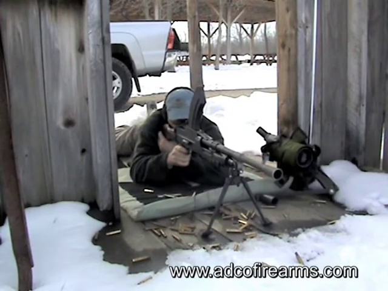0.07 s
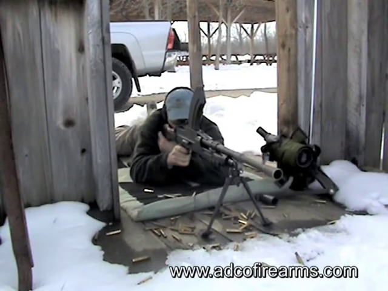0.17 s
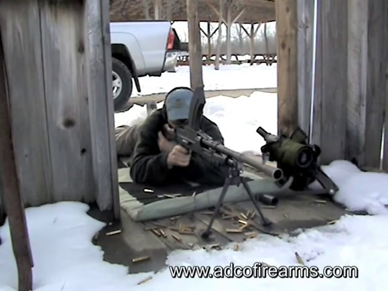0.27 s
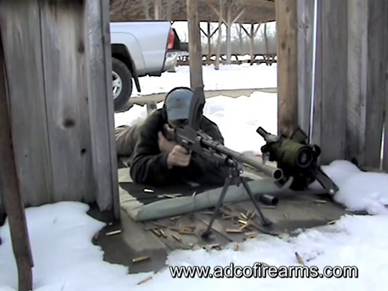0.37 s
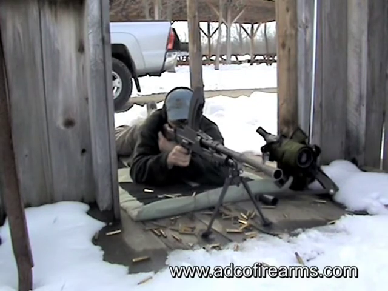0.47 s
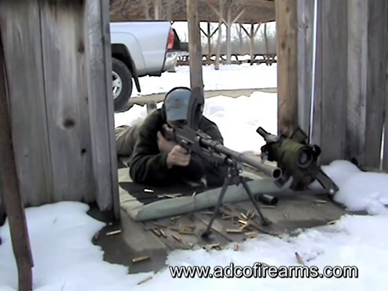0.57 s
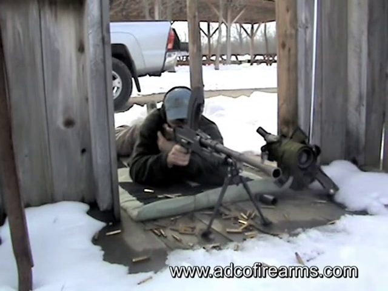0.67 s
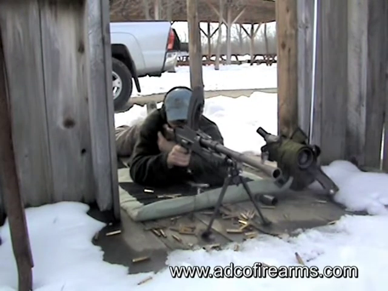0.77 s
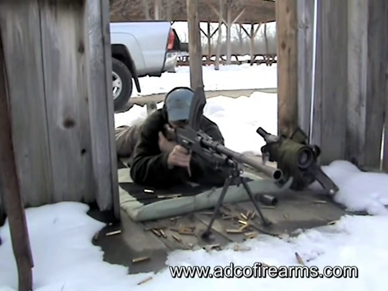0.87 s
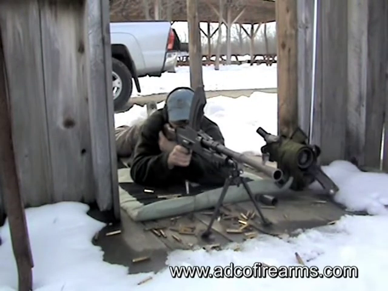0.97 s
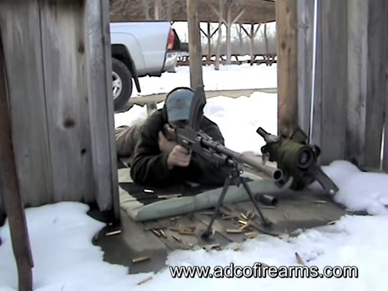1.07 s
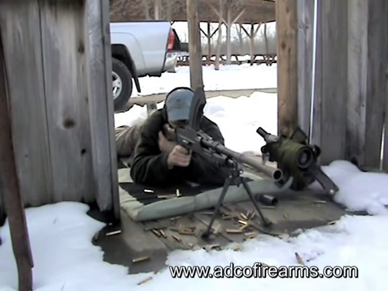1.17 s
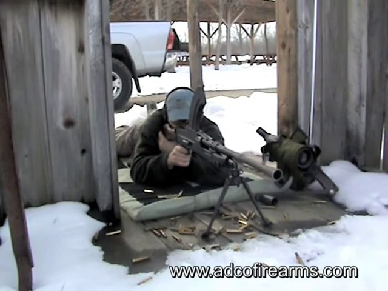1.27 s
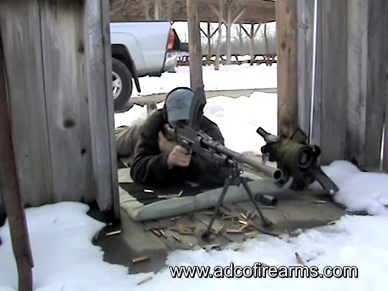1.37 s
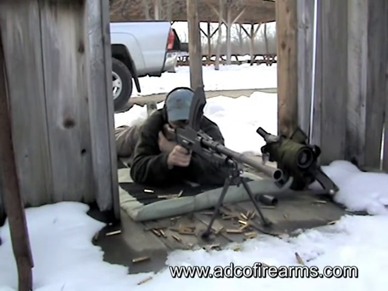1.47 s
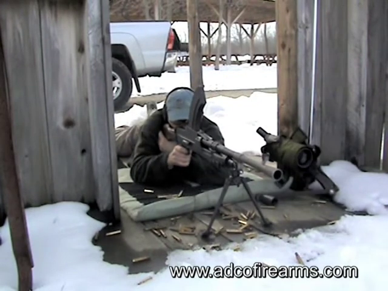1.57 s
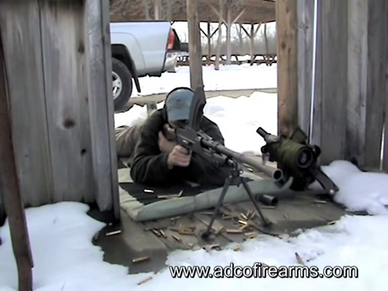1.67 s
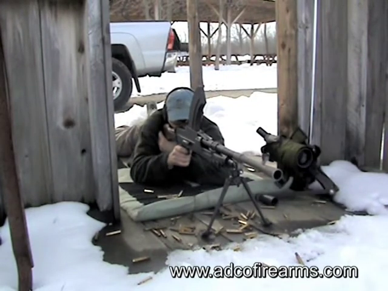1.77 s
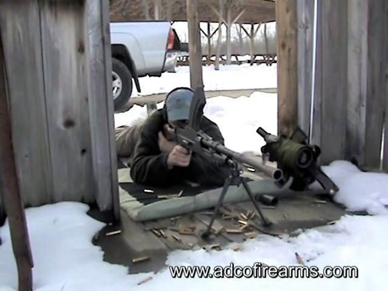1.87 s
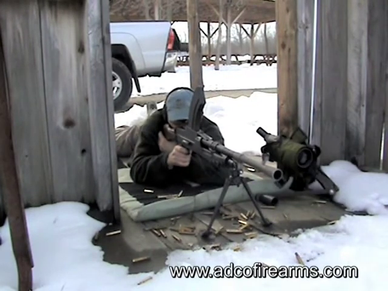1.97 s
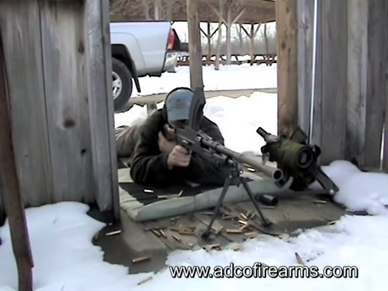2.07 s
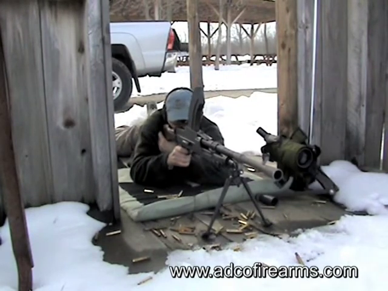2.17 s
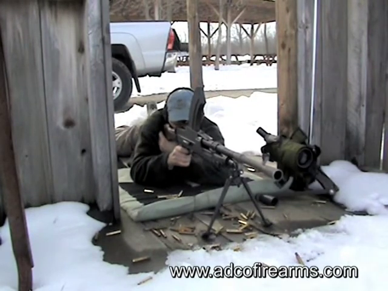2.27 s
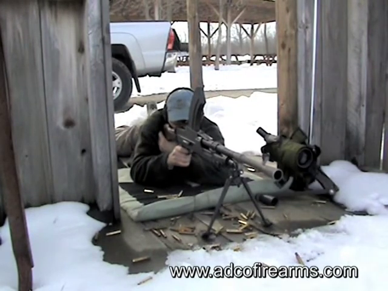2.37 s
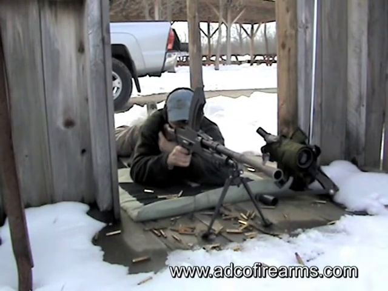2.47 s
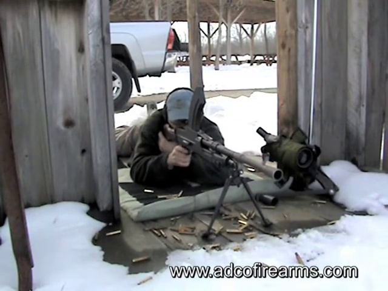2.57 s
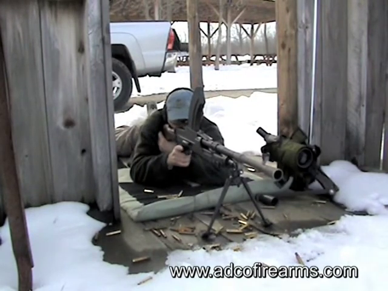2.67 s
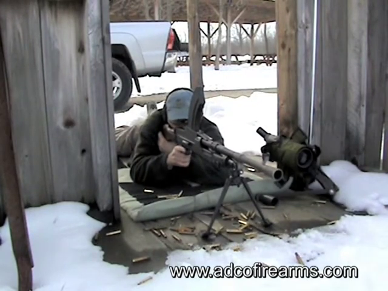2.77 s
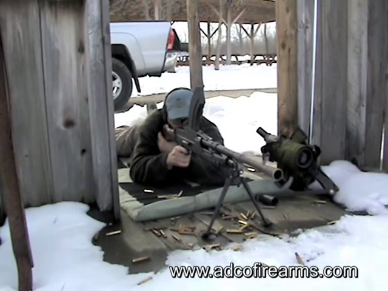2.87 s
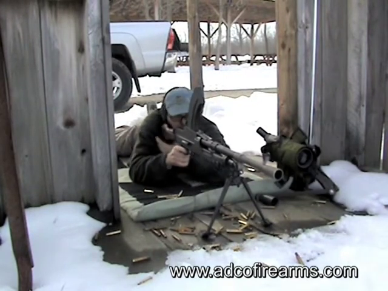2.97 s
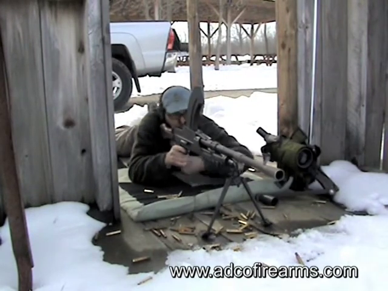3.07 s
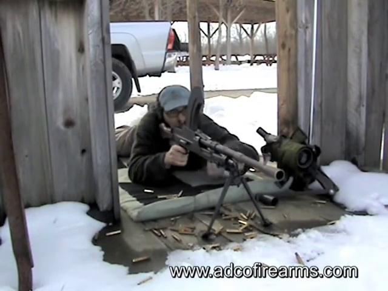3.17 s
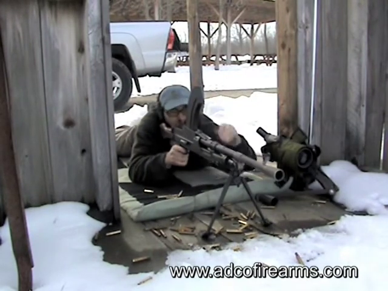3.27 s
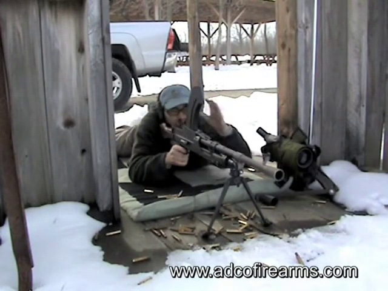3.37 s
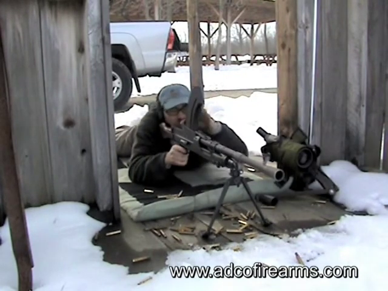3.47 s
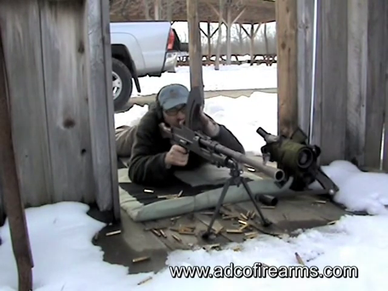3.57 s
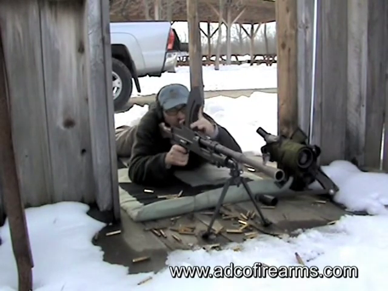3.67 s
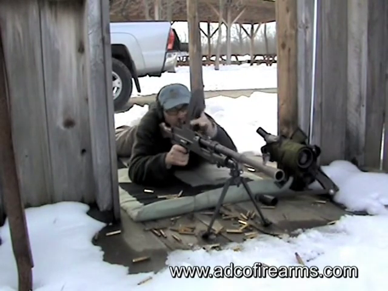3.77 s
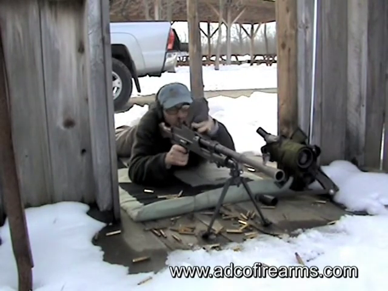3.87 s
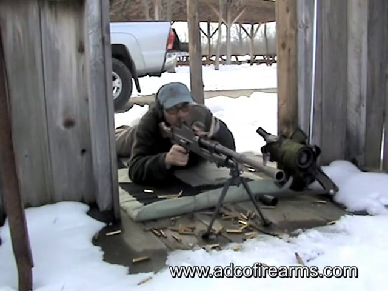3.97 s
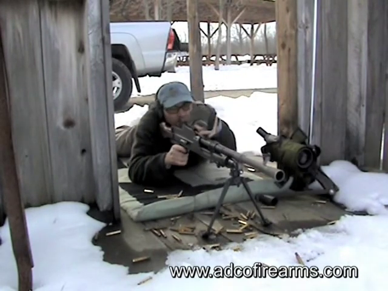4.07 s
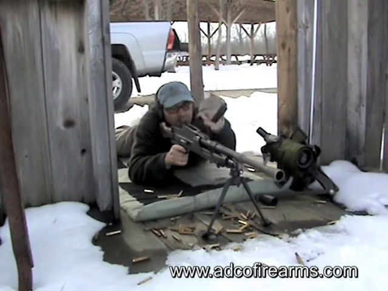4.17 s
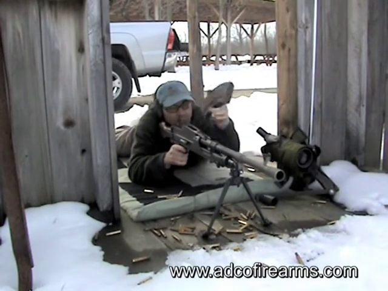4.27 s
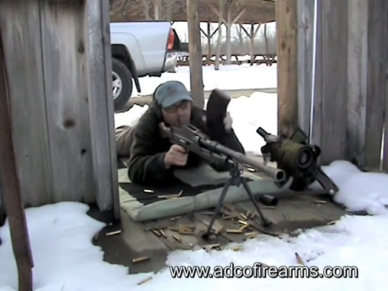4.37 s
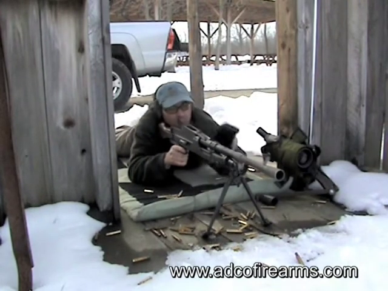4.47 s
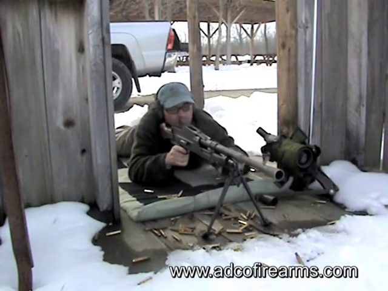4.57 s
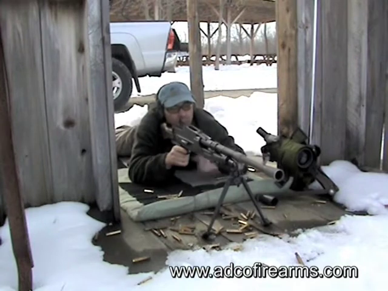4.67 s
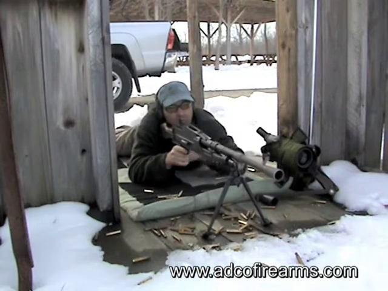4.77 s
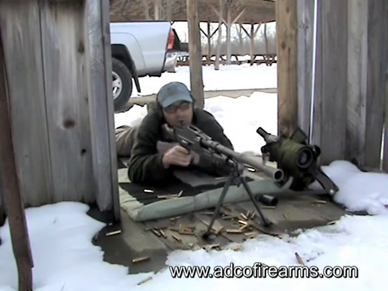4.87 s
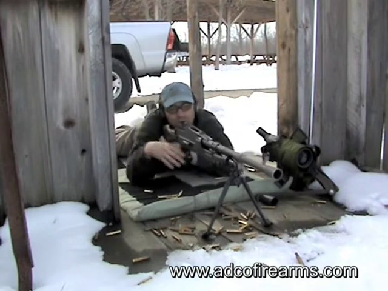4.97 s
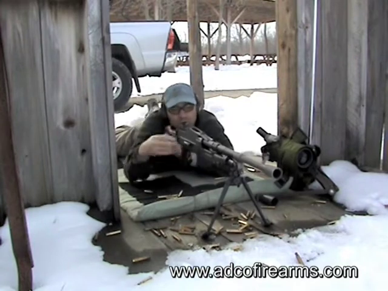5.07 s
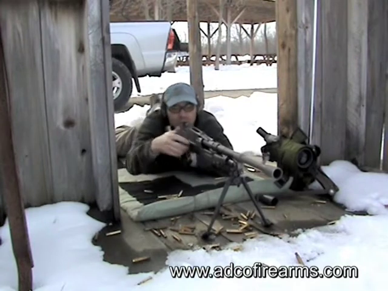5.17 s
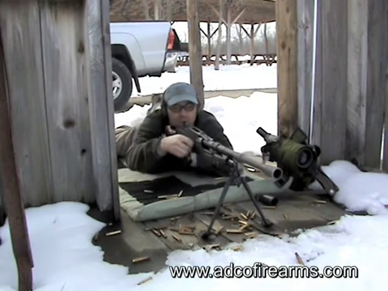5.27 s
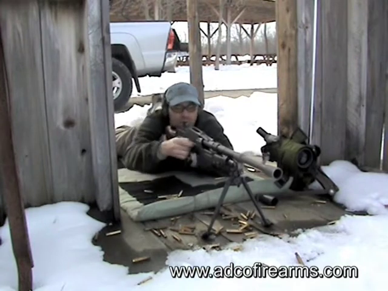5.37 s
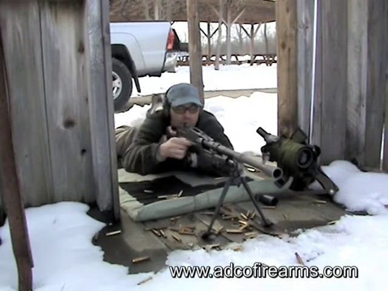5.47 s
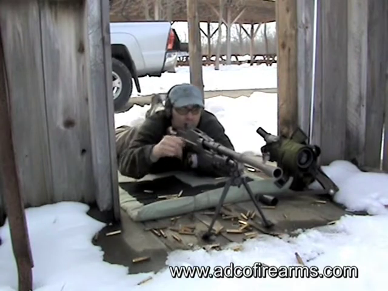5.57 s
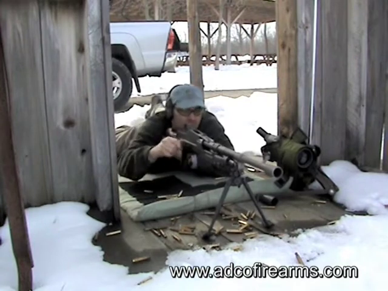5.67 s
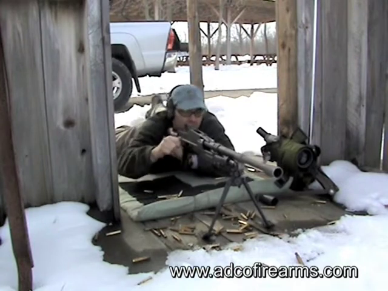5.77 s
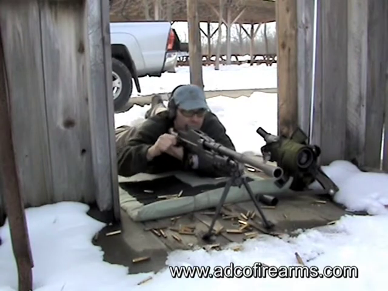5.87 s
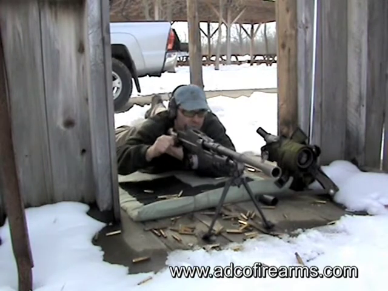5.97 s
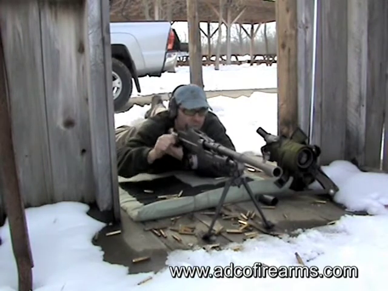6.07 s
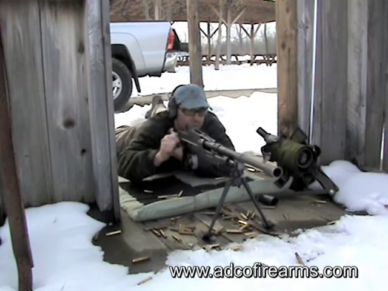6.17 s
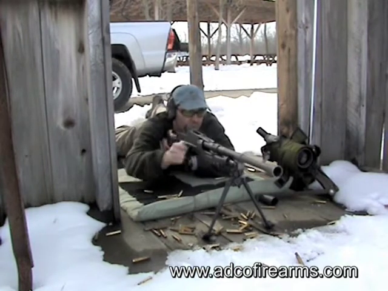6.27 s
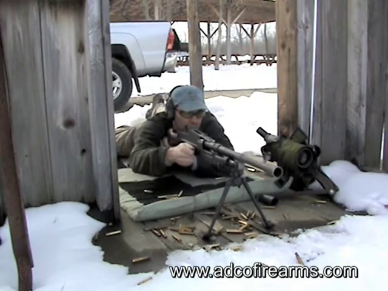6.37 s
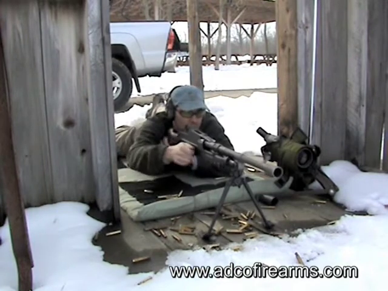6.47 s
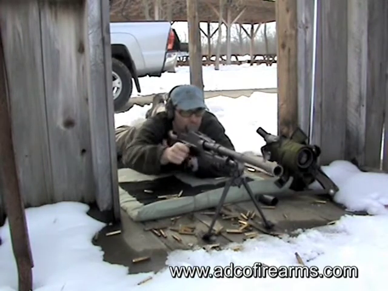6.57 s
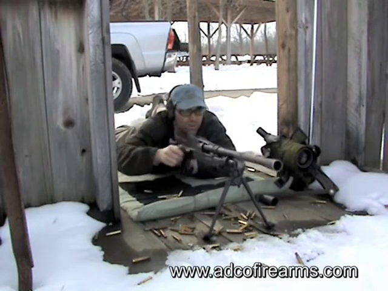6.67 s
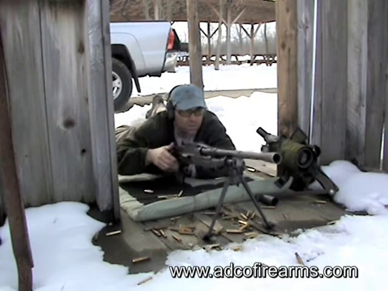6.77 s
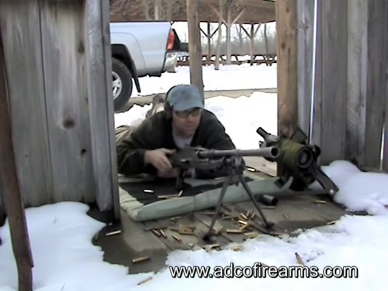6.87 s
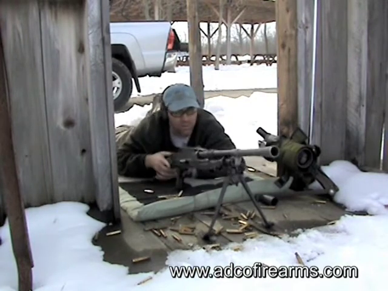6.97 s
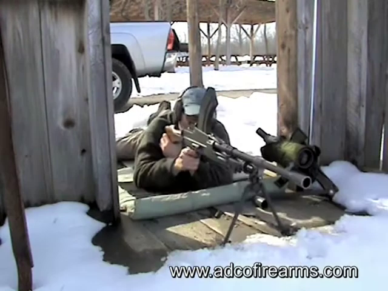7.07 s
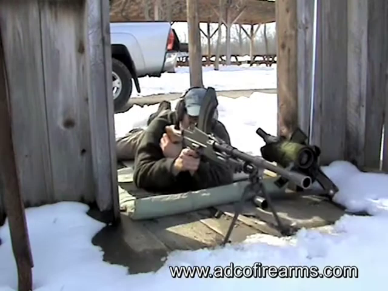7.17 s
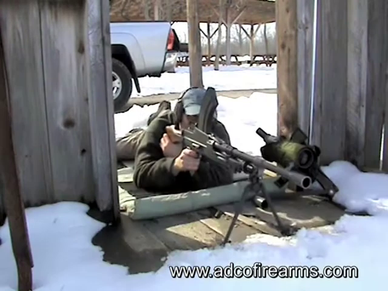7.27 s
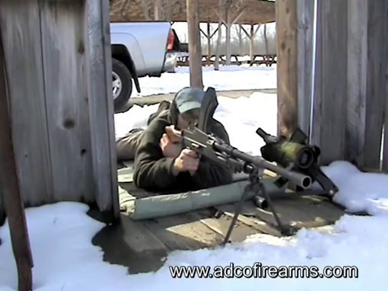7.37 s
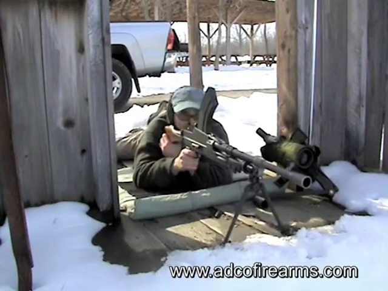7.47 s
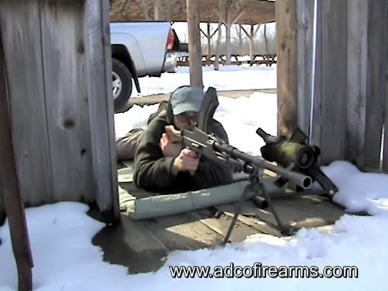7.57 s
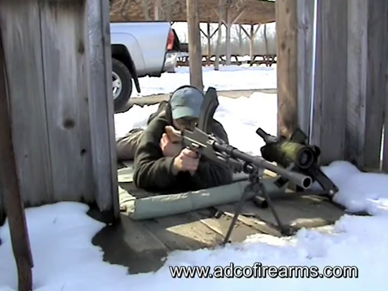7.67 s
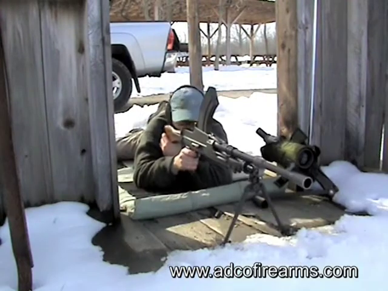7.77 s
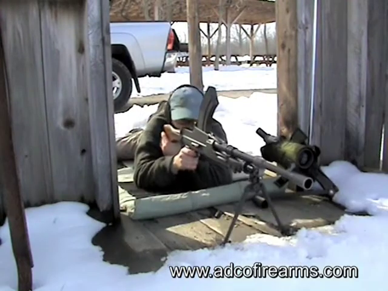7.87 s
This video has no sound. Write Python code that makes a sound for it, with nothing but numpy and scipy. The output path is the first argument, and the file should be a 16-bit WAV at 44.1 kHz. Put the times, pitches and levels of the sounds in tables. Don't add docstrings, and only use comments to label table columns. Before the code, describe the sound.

Close to a small stereo microphone in a wooden shed, an earlier shot's echo fades, then a bolt clacks and three rapid shots distort. Brass tinkles on boards while the echo rolls through snowy woods, growing duller. The bolt slams on an empty chamber, a magazine is pulled and dropped, and a handle is worked with sharp steel clacks. A cut brings louder, breezy air.

```python
import sys
import numpy as np
from scipy import signal
from scipy.fft import rfft, irfft
from scipy.io import wavfile
from scipy.ndimage import uniform_filter1d

SR = 44100
rng = np.random.default_rng(int(sys.argv[2]) if len(sys.argv) > 2 else 0)


def dump(signal):
    limited = np.clip(np.atleast_2d(signal).T, -1, 1)
    pcm = np.round(limited * 32767).astype(np.int16)
    wavfile.write(sys.argv[1], SR, pcm)


def convert_level_to_amplitude(level_db):
    exponent = np.asarray(level_db, float) / 20
    return 10 ** exponent


N = 349711
T = np.arange(N) / SR
FIRST_SCENE_END_S, NEXT_SCENE_START_S = 7.054, 7.066

# (time [s], muzzle blast level [dB], crack level [dB], hush before the crack [s])
SHOTS = [
    (.673, 3.5, 0, .002),
    (.775, 2.5, -4, 0.00054),
    (.868, 3, -5, 0),
]


def band(x, lo_hz, hi_hz):
    sos = signal.butter(2, [lo_hz, min(hi_hz, .45 * SR)], "band", fs=SR, output="sos")
    return signal.sosfilt(sos, x)


def unit(x):
    return x / np.sqrt(np.mean(x ** 2))


def on_log(hz, table, axis=1):
    columns = np.array(table)
    return np.interp(np.log(hz), np.log(columns[:, 0]), columns[:, axis])


def fade(t, t60):
    return np.exp(-np.log(1000) * np.maximum(t, 0) / t60) * (t >= 0)


def walk(rate_hz):
    k = int(SR / rate_hz)
    steps = np.repeat(rng.standard_normal(N // k + 1), k)
    return unit(uniform_filter1d(uniform_filter1d(steps, k), k)[:N])


def pair(size, lo_hz, hi_hz, wide_hz):
    mid, side = unit(band(rng.standard_normal((2, size)), lo_hz, hi_hz))
    width = min(np.sqrt(lo_hz * hi_hz) / wide_hz, 1) ** .24
    return (mid + width * side * np.array([[1], [-1]])) / np.sqrt(1 + width ** 2)


def coloured(table, wide_hz):
    hz = np.maximum(np.arange(N // 2 + 1) * SR / N, 1)
    mid, side = rfft(rng.standard_normal((2, N))) * convert_level_to_amplitude(on_log(hz, table))
    side = side * np.minimum(hz / wide_hz, 1)
    return unit(irfft(np.array([mid + side, mid - side]), N))


def add(out, s, x):
    i = int(s * SR)
    out[..., i:i + x.shape[-1]] += x[..., :N - i]


def gun():
    # (pitch [Hz], level [dB], build-up [s], t60 [s])
    blast_bands = [(40, -30, .01, 0.54), (90, -14.5, 0.027, 0.24), (200.2, -13, 0.021, .3),
                   (400, -8, 0.033, 0.41), (602.2, 0.5, 0.038, 0.38), (1200, -5, 0.028, .55),
                   (2500, -7, 0.009, .5), (5000, -9, 0.0038, .42), (9000, -19, 0.0023, .32),
                   (15000, -30, .003, 0.34)]
    stun_db, stun_s = -11, .022
    crack_rise_s, crack_t60_s = .05, .26
    crack, blast = np.zeros((2, N)), np.zeros((2, N))
    t = T[:3 * SR // 4]
    crack_shape = (1 - fade(t, crack_rise_s)) * fade(t, crack_t60_s)
    for s, blast_db, crack_db, hush_s in SHOTS:
        add(crack, s, convert_level_to_amplitude(crack_db) * pair(len(t), 2500, 13000, 40000) * crack_shape)
        stun = (T > s - hush_s) * np.exp(-((T - s) / stun_s) ** 4)
        blast = blast * convert_level_to_amplitude(stun_db * stun)
        for hz in 35 * 2 ** np.arange(0, 9, .5):
            db, rise_s, t60_s = (on_log(hz, blast_bands, axis=k) for k in (1, 2, 3))
            shape = (t / (t + rise_s)) ** 2 * convert_level_to_amplitude(-60 * (t / t60_s) ** 1.25)
            noise = pair(len(t), hz / 2 ** .25, hz * 2 ** .25, 40000)
            add(blast, s, convert_level_to_amplitude(blast_db + db) * shape * noise)
    return crack + blast * convert_level_to_amplitude(1.2 * walk(60))


def ring(hz, t60):
    t = T[:SR // 3]
    rattle = uniform_filter1d(rng.standard_normal((2, len(t))), 150)
    tone = np.sin(2 * np.pi * hz * t + 0.08 * np.cumsum(rattle[0]))
    return convert_level_to_amplitude(32 * rattle[1]) * tone * fade(t, t60) * (1 - fade(t, 0.0033))


def clack(db, hz, hard_db, softer, mid_edge_db, t60_s):
    t = T[:SR // 6]
    octaves = np.log2(hz / 2500)
    body_db = hard_db - softer * db - 4 * octaves
    edge_db = mid_edge_db + 3 * octaves
    noise = rng.standard_normal((4, len(t)))
    spray = noise[:3] * convert_level_to_amplitude(2.2 * unit(uniform_filter1d(noise[3], 60)))
    spray = spray * (1 - fade(t, .005)) * fade(t, max(t60_s, .01))
    part = convert_level_to_amplitude(2) * band(spray[0], hz * .93, hz * 1.07)
    middle = band(spray[1], 1400, 2700) + convert_level_to_amplitude(.4 * edge_db + 3.5) * band(spray[2], 3000, 7000)
    body = convert_level_to_amplitude(body_db + 15.0) * band(band(spray[2], 480, 1300), 420, 2300)
    edge = convert_level_to_amplitude(edge_db + 5) * band(spray[1], 5100, 11000)
    return convert_level_to_amplitude(db - 1) * (part + middle + body + edge)


def steel():
    # (time [s], peak level [dB], part pitch [Hz])
    bolt = [(.604, -18, 6300), (.635, -22, 2500), (.6477, -4.5, 3550), (.6622, 2, 2940),
            (2.2508, -18, 4700), (2.299, -13, 4000), (2.3091, 2, 4060), (2.3171, -5.5, 1720),
            (2.3303, -10, 2650), (2.3496, -13, 5040)]
    # (time [s], peak level [dB], part pitch [Hz])
    magazine = [(3.72, -57, 1566), (3.7462, -30, 1294), (3.7599, -35, 1280), (3.8926, -13.5, 1444),
                (3.9094, -30, 3840), (4.0671, -18.5, 1153), (4.1094, -43, 1200), (4.1999, -48, 990),
                (4.2625, -46, 1200)]
    # (time [s], peak level [dB], part pitch [Hz])
    handle = [(5.697, -10, 5770), (5.7069, -10, 1490), (5.908, -47, 1500), (5.917, -23, 3700),
              (5.9327, -10, 2520), (5.9444, -17.5, 5520), (6.0045, -36, 3000), (6.0207, -33, 2520),
              (6.0574, -15.5, 5160), (6.0639, -8.5, 4700), (6.0726, -8.5, 2300), (6.0824, -5, 4900),
              (6.0912, -10.5, 5000), (6.1094, -27, 1400), (6.1365, -26, 1520), (6.1744, -30, 4760),
              (6.193, -35, 1480), (6.2105, -16, 4600), (6.2302, -14, 4800), (6.3022, -48, 3740),
              (6.3355, -38.5, 1580), (6.372, -35, 2440), (6.4068, -9.5, 4200), (6.4636, -1.5, 2800),
              (6.519, -39.5, 1430)]
    # (time [s], peak level [dB], part pitch [Hz])
    taps = [(2.653, -41, 1100), (3.1572, -33.5, 5077), (3.6578, -51.5, 1079), (5.059, -50, 1559),
            (5.0905, -58, 2910), (5.1709, -53.5, 2340), (5.3708, -54, 2316), (5.5005, -27.5, 4810),
            (5.5995, -35.5, 2340), (6.601, -36, 1670), (6.915, -39, 2094), (7.0466, -54.5, 2318),
            (7.529, -33, 1530)]
    # (time [s], peak level [dB], part pitch [Hz])
    drop_blows = [(4.78, -7, 1460), (4.7885, -12, 4400), (4.7966, -13, 997), (4.8045, -16, 2650),
                  (4.9119, -23, 1720), (4.947, -41, 1200)]
    # (pitch [Hz], level [dB], t60 [s])
    magazine_modes = [(590, 9, 0.11), (1017, -3, 0.15), (1927, -8, 0.16), (2650, 6, 0.11),
                      (4000, 0.5, 0.075), (4400, -3, 0.2), (5500, -1, 0.084), (6350, -10, 0.082),
                      (6830, -3, 0.08)]
    # (pitch [Hz], level [dB], t60 [s])
    handle_modes = [(470, -6, .06), (700, -4, 0.06), (1430, 0.5, 0.16), (2580, -6, 0.25), (3000, -5, .08),
                    (4200, -5, 0.09), (4830, 3, .16)]
    # (time [s], pitch [Hz], level [dB], t60 [s])
    lone_pings = [(2.349, 8090, -26, .05), (2.356, 8740, -33, .04), (2.404, 4450, -36, .1),
                  (3.157, 5120, -62, .1), (4.07, 1200, -46, .15), (4.09, 1800, -54, .2),
                  (5.54, 650, -56, .06), (5.61, 8200, -66, .2), (6.302, 3810, -50, .08),
                  (6.465, 1400, -37, .16), (7.529, 430, -39, .07), (6.232, 4780, -36, .17),
                  (5.705, 470, -33, .07), (5.709, 700, -29, .08), (6.408, 640, -35, .06),
                  (6.075, 4780, -31, .12), (6.465, 2530, -48, .4), (6.34, 1560, -50, .1),
                  (5.503, 620, -50, .06)]
    detune_db_per_octave = 14
    # blows, (body dB, body dB lost per dB of blow, edge dB, t60 s), modes, ring dB
    parts = [(bolt, (-25, .1, -9, .047), [], 0),
             (magazine, (-25, .35, -18, .047), magazine_modes, -25),
             (handle, (-24, .15, -14, .047), handle_modes, -26.5),
             (taps, (-22, 0.23, -19, 0.0341), [], 0),
             (drop_blows, (-16, .2, -10, .05), magazine_modes, -25)]
    out = np.zeros(N)
    for blows, hardness, modes, ring_db in parts:
        top_db = max([mode[1] for mode in modes], default=0)
        for s, db, hz in blows:
            add(out, s, clack(db, hz, *hardness))
            for mode_hz, mode_db, t60_s in modes:
                off_db = detune_db_per_octave * abs(np.log2(mode_hz / hz))
                add(out, s, convert_level_to_amplitude(db + ring_db + mode_db - top_db - off_db) * ring(mode_hz, t60_s))
    for s, hz, db, t60_s in lone_pings:
        add(out, s, convert_level_to_amplitude(db) * ring(hz, t60_s))
    return out


def thuds():
    # (time [s], level [dB], t60 [s])
    jolts = [(.663, -21.5, 0.082), (2.309, -24, 0.061), (4.781, -39, 0.15), (4.947, -48.5, 0.092),
             (5.7, -56, 0.051), (6.073, -48, 0.15), (6.215, -52, .06), (6.463, -52, 0.057)]
    out, t = np.zeros(N), T[:SR // 6]
    for s, db, t60_s in jolts:
        noise = unit(band(rng.standard_normal(len(t)), 80, 570))
        add(out, s, convert_level_to_amplitude(db) * noise * fade(t, t60_s))
    return out


def brass():
    # (time [s], level [dB])
    bounces = [(1.194, -35), (1.213, -33.5), (1.25, -37.5), (1.308, -41.5), (1.365, -54), (1.429, -61.5),
               (1.507, -59.5), (1.75, -75.5), (1.9, -76)]
    # (pitch [Hz], level [dB], t60 [s])
    tube_modes = [(7280, -7.5, 0.22), (8900, -12, .15), (9250, -9, .16), (9500, -5, .2), (9900, -7, 0.17),
                  (10150, -1, 0.14), (10500, 1, 0.25), (10800, -5, .15), (11000, -8, .2), (11250, -9, .18)]
    # (time [s], pitch [Hz], level [dB], t60 [s])
    overtones = [(1.194, 6654, -29, .12), (1.213, 14930, -45, .2), (1.308, 15340, -50, .15),
                 (1.507, 15200, -63, .15)]
    out, t = np.zeros(N), T[:2000]
    for s, db in bounces:
        tick = band(rng.standard_normal(len(t)), 5500, 15500) * fade(t, .03)
        add(out, s, convert_level_to_amplitude(2 * db + 29) * tick)
        for hz, mode_db, t60_s in tube_modes:
            add(out, s, convert_level_to_amplitude(db + mode_db + 1.6 * rng.standard_normal()) * ring(hz, t60_s))
    for s, hz, db, t60_s in overtones:
        add(out, s, convert_level_to_amplitude(db) * ring(hz, t60_s))
    return out


def shed(x):
    level_db, low_t60_s, high_t60_s = -14.5, 0.26, 0.15
    t = T[:SR // 2]
    low = pair(len(t), 440, 5100, 7000) * fade(t, low_t60_s)
    high = 2.6 * pair(len(t), 3000, 13000, 7000) * fade(t, high_t60_s)
    far = 0.43 * pair(len(t), 700, 9000, 7000) * fade(t, 0.49)
    tail = (low + high + far) * (1 - fade(t, 0.011))
    tail = tail / np.sqrt(np.sum(tail[0] ** 2))
    return x + convert_level_to_amplitude(level_db) * signal.fftconvolve(x[None], tail, axes=1)[:, :N]


def coat():
    # (centre time [s], half length [s], level [dB], lowest pitch [Hz], highest pitch [Hz])
    rubs = [(0.621, 0.011, -30, 1500, 9000), (2.283, .016, -31, 1970, 11000), (2.41, .03, -46, 2500, 11700),
            (2.5, 0.068, -58.5, 2500, 7440), (3.891, 0.0022, -46.5, 400, 3520),
            (3.092, 0.028, -67, 1996, 11000), (3.796, 0.027, -72, 1200, 7990), (4.142, .06, -59, 700, 2300),
            (4.25, 0.021, -57.5, 489, 5800), (4.68, 0.056, -72, 1970, 9000), (5.071, .04, -69, 3016, 9900),
            (5.199, 0.023, -67, 2500, 9900), (6.357, .03, -48, 1100, 3000), (6.7, 0.17, -73, 1003, 5000),
            (6.92, 0.13, -73, 55.06, 250), (7.2, 0.2, -62, 2900, 4300), (7.896, .07, -55.5, 1200, 7500)]
    out, grain = np.zeros((2, N)), convert_level_to_amplitude(1.5 * walk(220))
    for s, half_s, db, lo_hz, hi_hz in rubs:
        t = T[:int(5 * half_s * SR)] - 2.5 * half_s
        swell = np.exp(-(t / half_s) ** 2)
        same_scene = (s + t > NEXT_SCENE_START_S) == (s > NEXT_SCENE_START_S)
        add(out, s + t[0], convert_level_to_amplitude(db) * swell * same_scene * pair(len(t), lo_hz, hi_hz, 12000))
    return out * grain


def woods():
    # (time since the first round [s], level [dB])
    echo = [(.48, -32.5), (.515, -35.5), (.88, -32), (1.2, -40.5), (1.34, -44), (1.53, -44.5), (1.93, -52),
            (3.04, -63.5), (4.5, -71.5)]
    # (pitch [Hz], level [dB per Hz])
    echo_colour = [(18, -57), (30, -25.5), (71, -22.5), (109, -27.5), (175, -18), (297, -7.5), (565, 2),
                   (684, -2.5), (1400, -5.5), (1580, -5), (2360, -10.5), (4840, -28.5), (9000, -53),
                   (11700, -78.5), (19800, -120)]
    earlier_burst_s, end_db_per_s = -0.89, 6
    air_loss_db_per_s, air_power = 2.5, 1.5
    echo_s, echo_db = np.array(echo).T
    hz, t, noise = signal.stft(rng.standard_normal((2, N)), SR, nperseg=1024)
    hz = np.maximum(hz, 1)[:, None]
    first_s = SHOTS[0][0]
    since = np.where(t < first_s, t - earlier_burst_s, t - first_s)
    level_db = np.interp(since, echo_s, echo_db) - end_db_per_s * np.maximum(since - echo_s[-1], 0)
    level_db = level_db + 1.2 * np.interp(t, T, walk(14))
    loss_db = air_loss_db_per_s * (hz / 1000) ** air_power * np.maximum(since - .9, -.4)
    mid, side = noise * convert_level_to_amplitude(level_db + on_log(hz, echo_colour) - loss_db + 16.5)
    side = side * np.minimum(hz / 7000, 1) ** .6
    return signal.istft(np.array([mid + side, mid - side]), SR)[1][:, :N]


def air():
    # (pitch [Hz], level [dB per Hz])
    still_colour = [(20, -13), (45, -11.5), (80, -3), (125, -15.5), (200, -17), (300, -19), (550, -16.5),
                    (1000, -23.5), (1600, -28), (2500, -30.5), (4000, -35.5), (15500, -43)]
    # (pitch [Hz], level [dB per Hz])
    breeze_colour = [(18, -33), (30, 1), (79, 0.5), (148, -11.5), (269, -10.5), (369, -14.5), (690, -10.5),
                     (807, -15), (2680, -23.5), (3670, -26.5), (4900, -31.5), (15500, -35)]
    still_db, breeze_db, whine_db, whine_hz = -67, -53, -86, 2520
    next_scene = T > NEXT_SCENE_START_S
    still = convert_level_to_amplitude(still_db + 1.0 * walk(8)) * coloured(still_colour, 1500)
    breeze = convert_level_to_amplitude(breeze_db + 0.68 * walk(8.6)) * coloured(breeze_colour, 410)
    whine = convert_level_to_amplitude(whine_db + 1.7 * walk(5.7) + 14.0 * next_scene) * np.sin(2 * np.pi * whine_hz * T)
    return np.where(T < NEXT_SCENE_START_S, still, breeze) + whine


def scene():
    gap = (T > FIRST_SCENE_END_S) & (T < NEXT_SCENE_START_S)
    echo = woods() * (T < FIRST_SCENE_END_S)
    close = shed(steel() + thuds() + brass())
    return (gun() + close + coat() + echo + air()) * uniform_filter1d(1. - gap, 90)


def top_cut(x):
    return signal.sosfilt(signal.butter(12, 15610, fs=SR, output="sos"), x)


def record(dry):
    flat = dry / (1 + np.abs(dry / 1.02) ** 6) ** (1 / 6)
    lopsided = flat + 0.12 * band(flat ** 2, 25, 140)
    tilted = band(lopsided, 22, 18000)
    return top_cut(np.clip(tilted, -1, 1))


dry = scene()
out = record(dry)
dump(out)
```